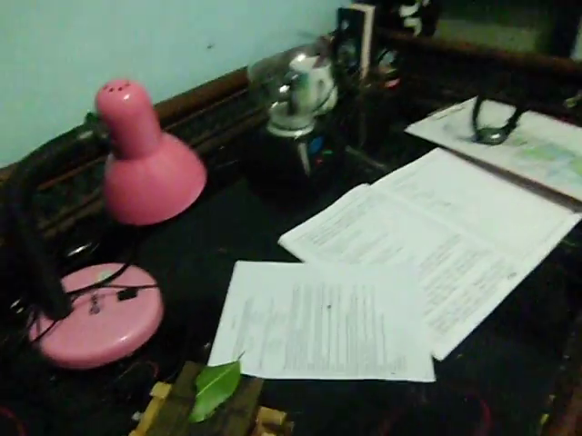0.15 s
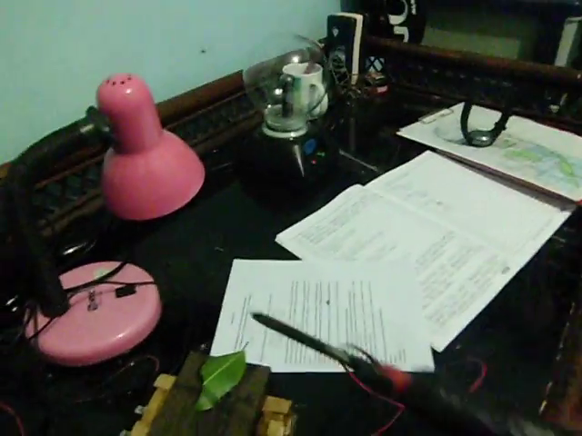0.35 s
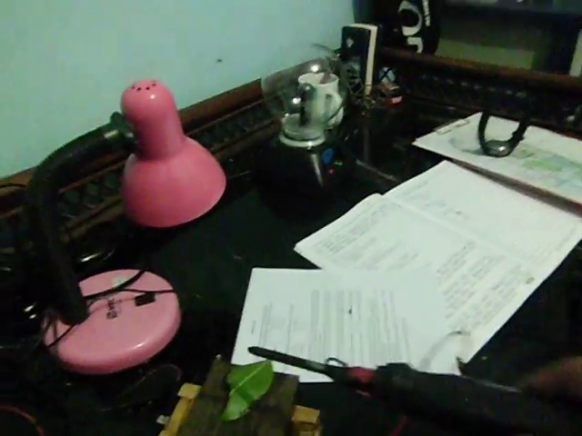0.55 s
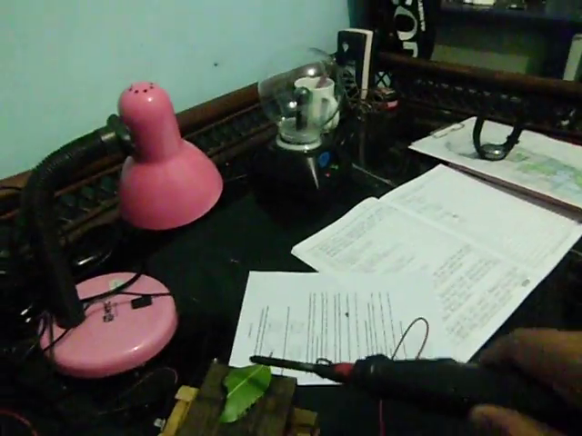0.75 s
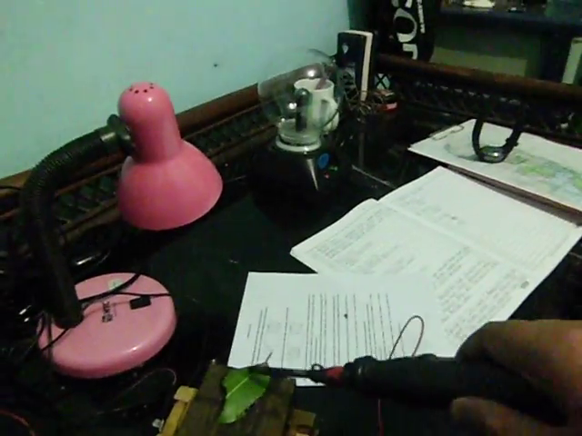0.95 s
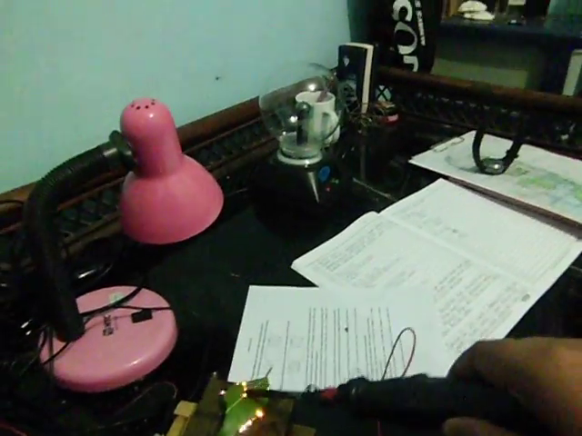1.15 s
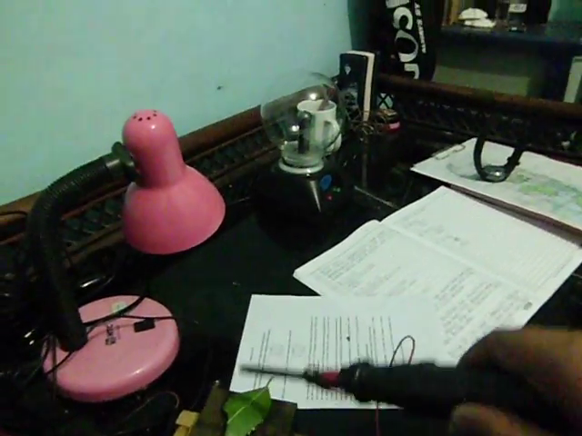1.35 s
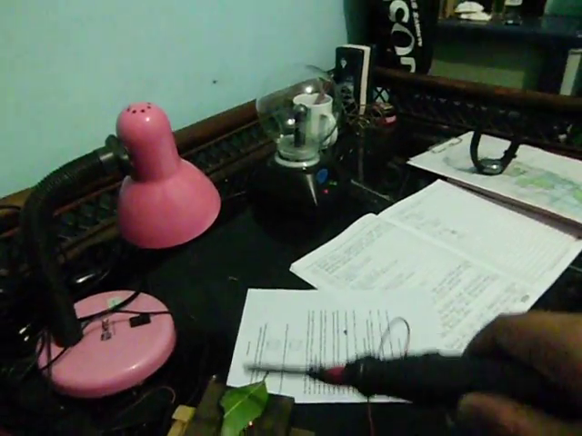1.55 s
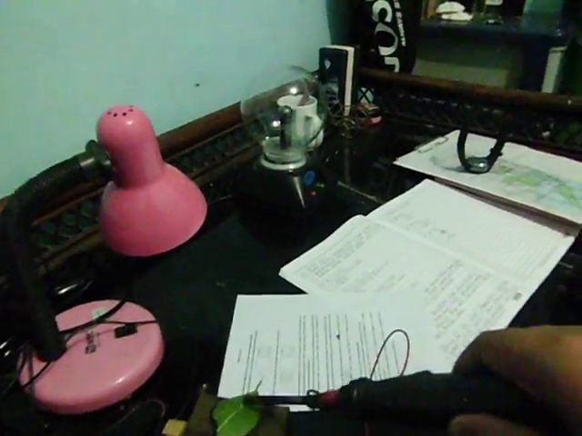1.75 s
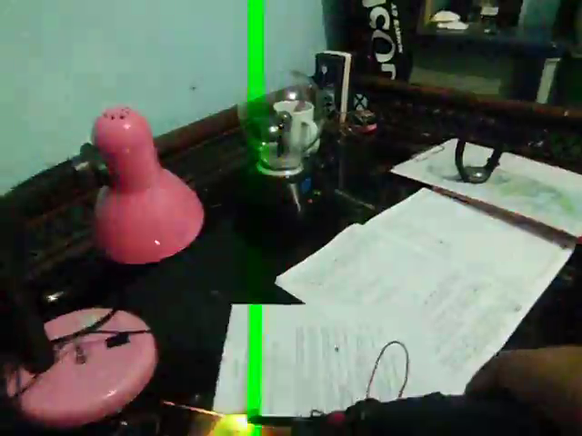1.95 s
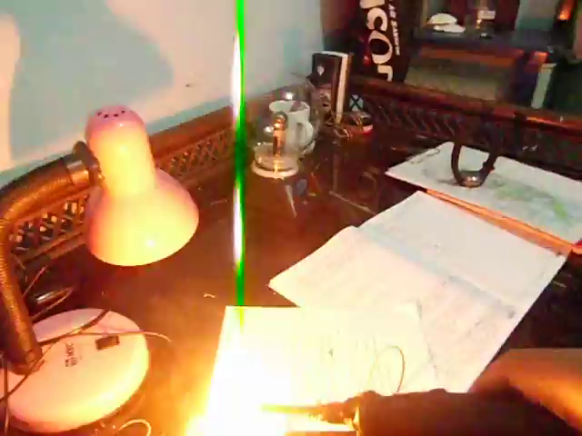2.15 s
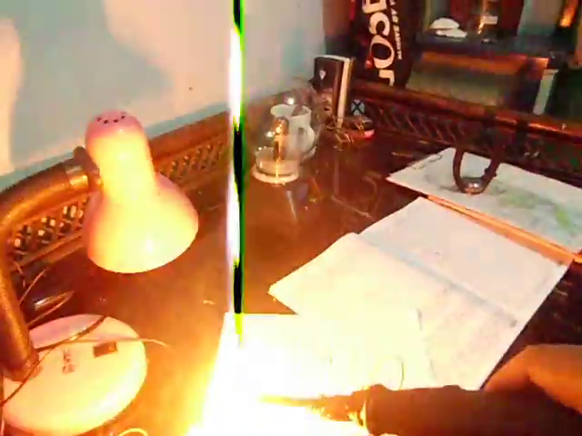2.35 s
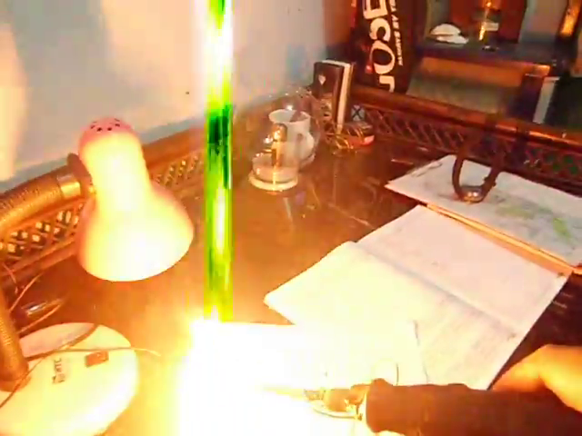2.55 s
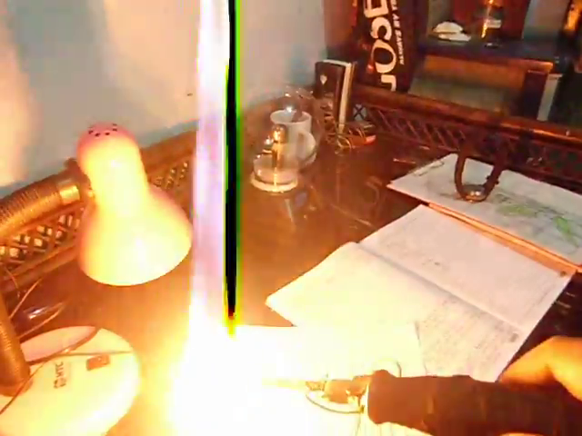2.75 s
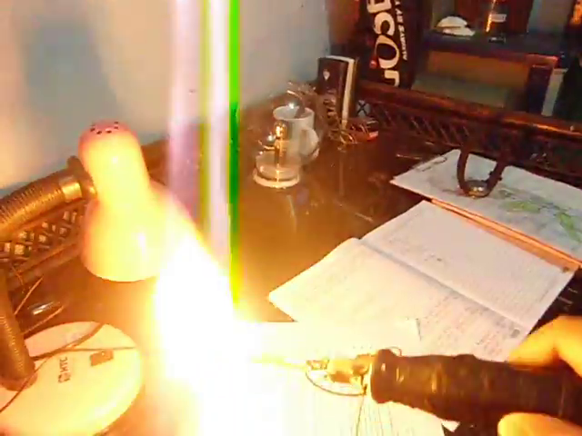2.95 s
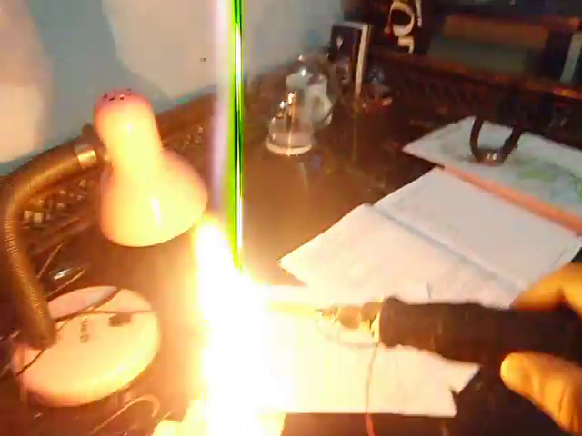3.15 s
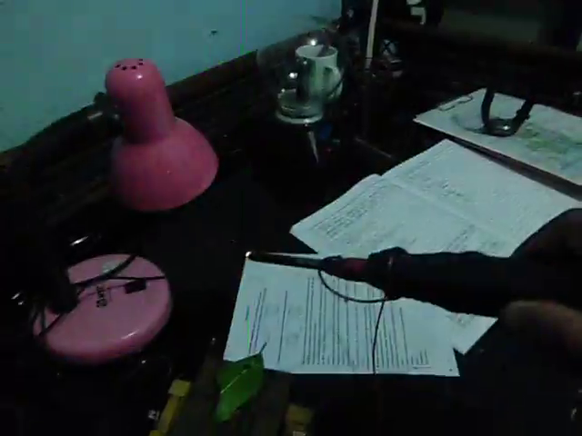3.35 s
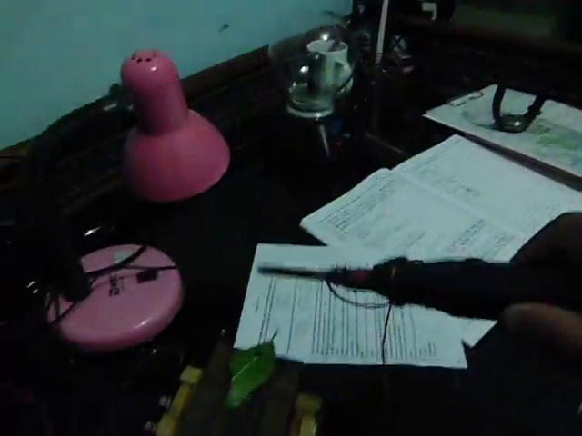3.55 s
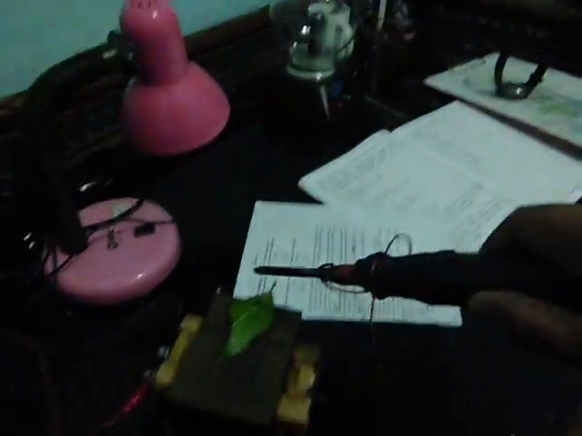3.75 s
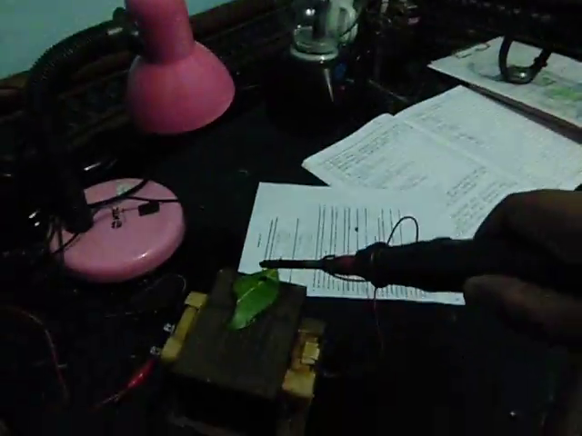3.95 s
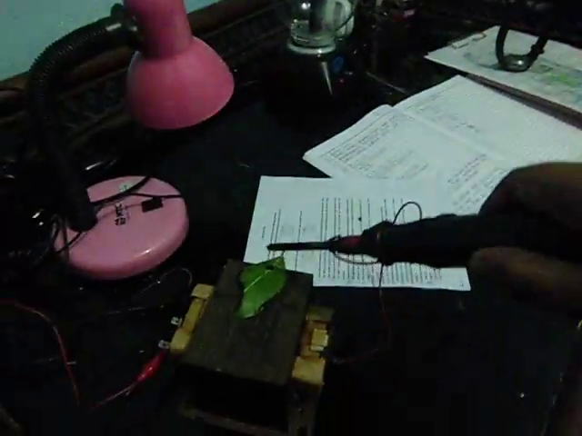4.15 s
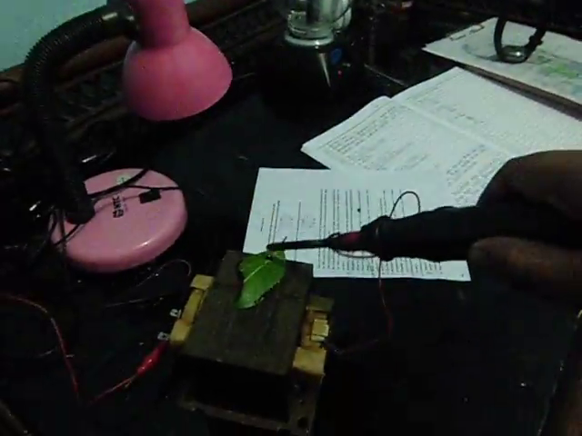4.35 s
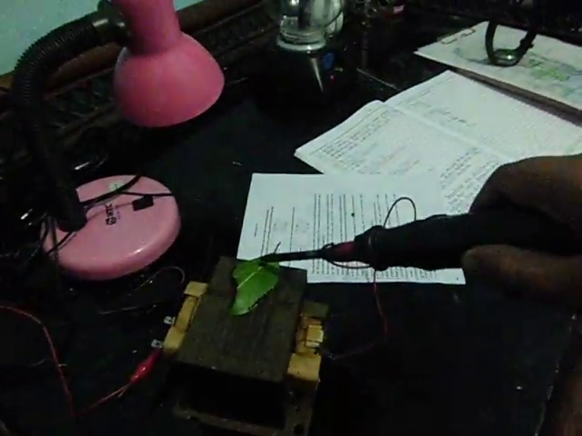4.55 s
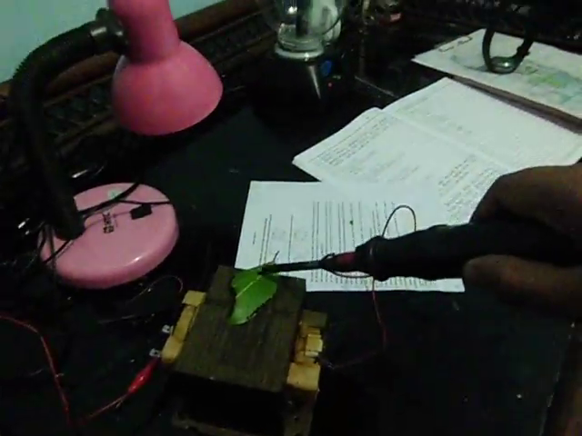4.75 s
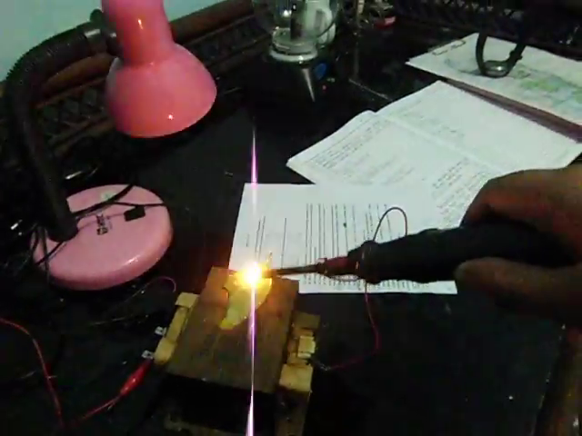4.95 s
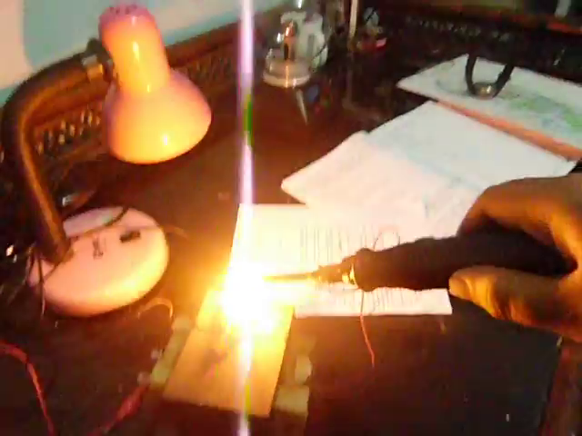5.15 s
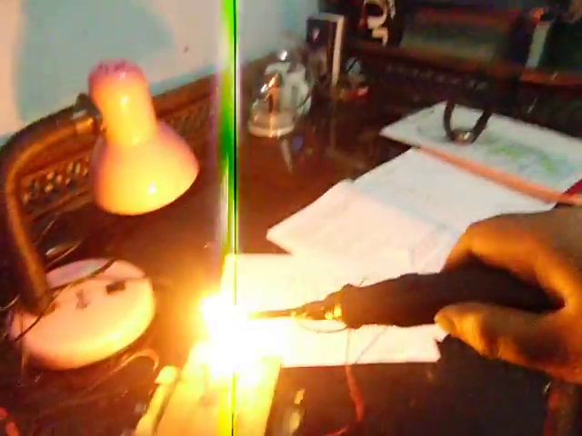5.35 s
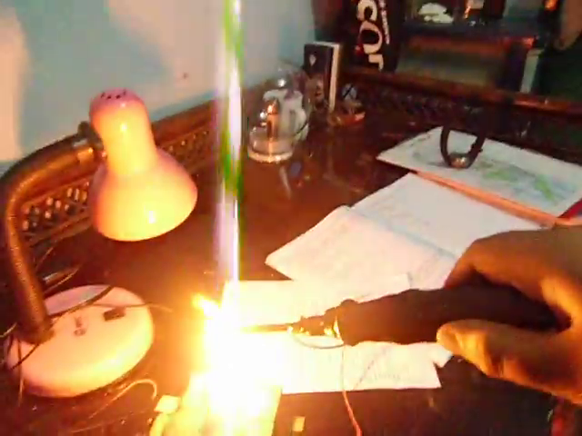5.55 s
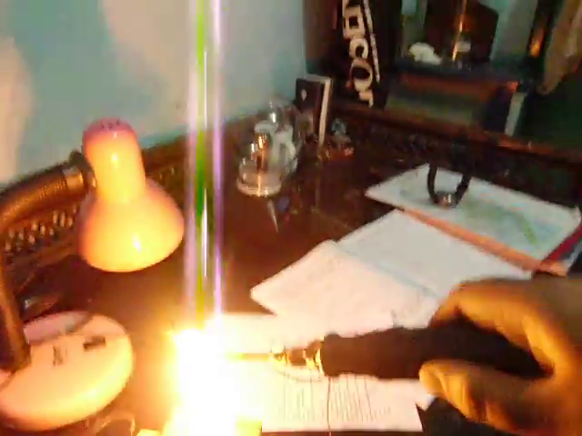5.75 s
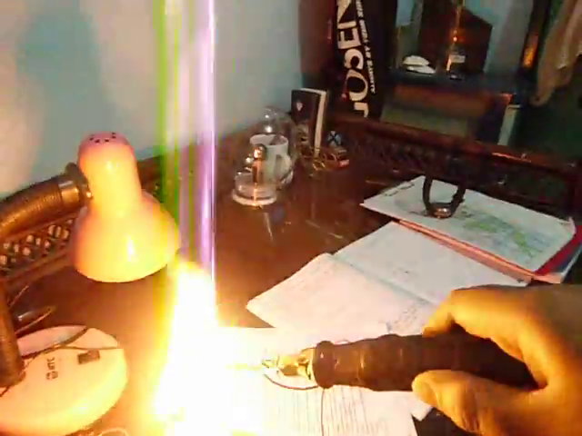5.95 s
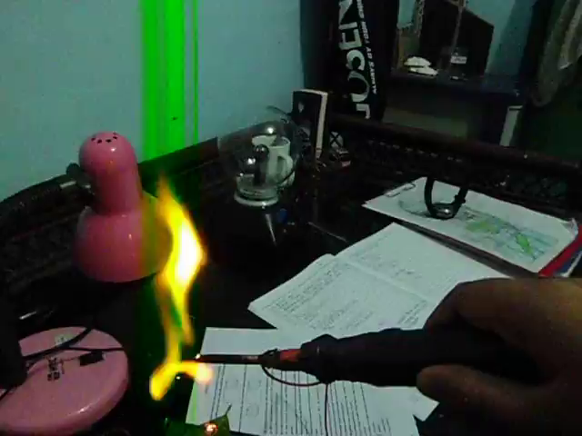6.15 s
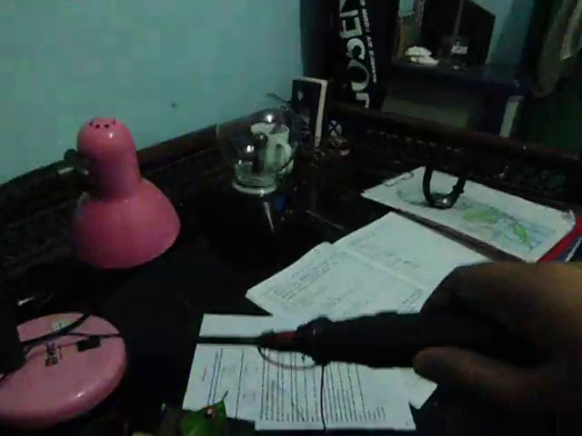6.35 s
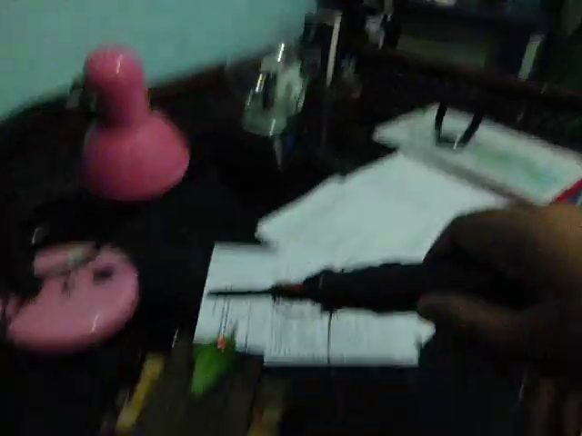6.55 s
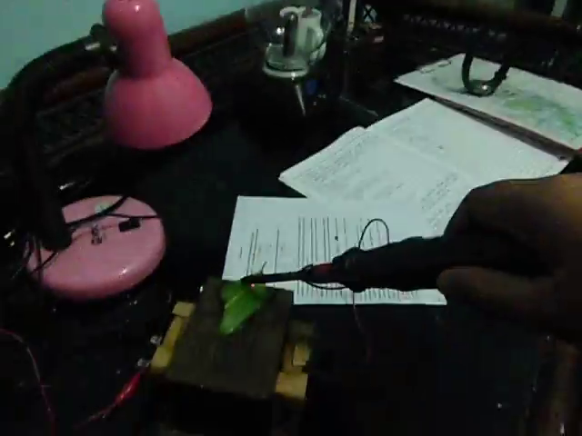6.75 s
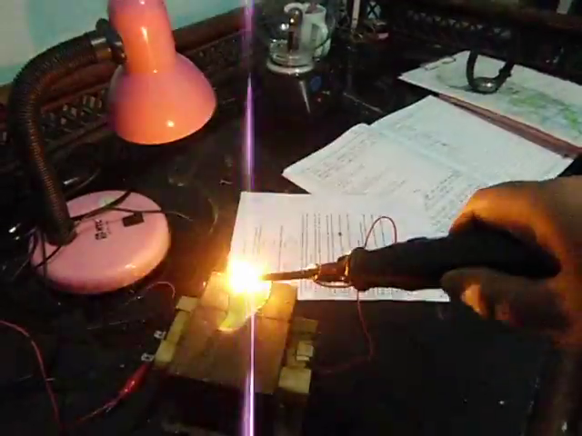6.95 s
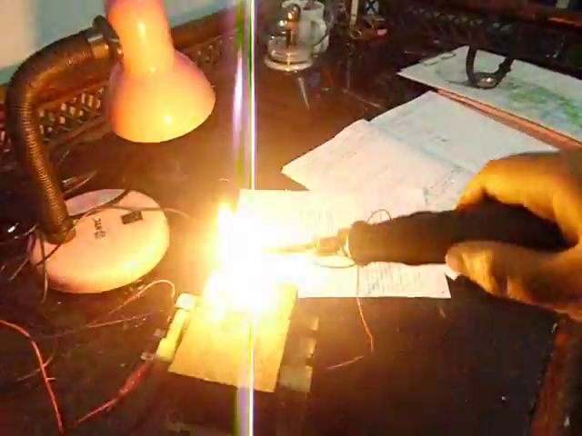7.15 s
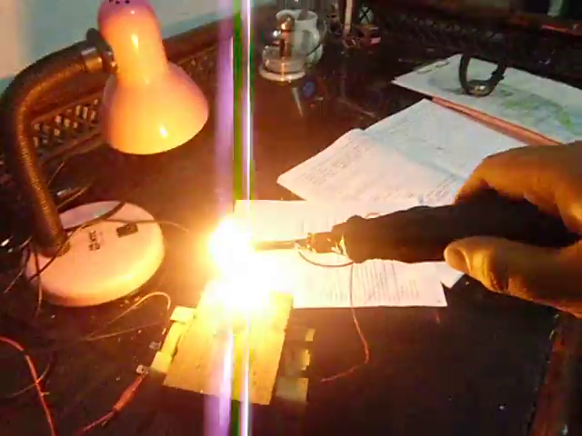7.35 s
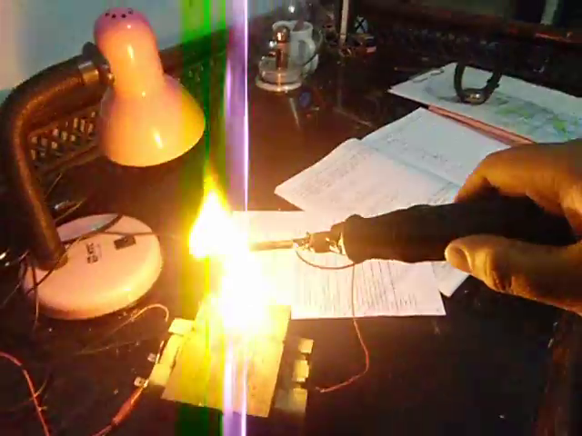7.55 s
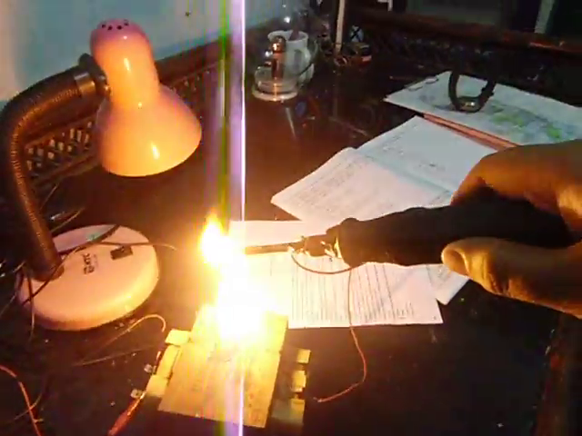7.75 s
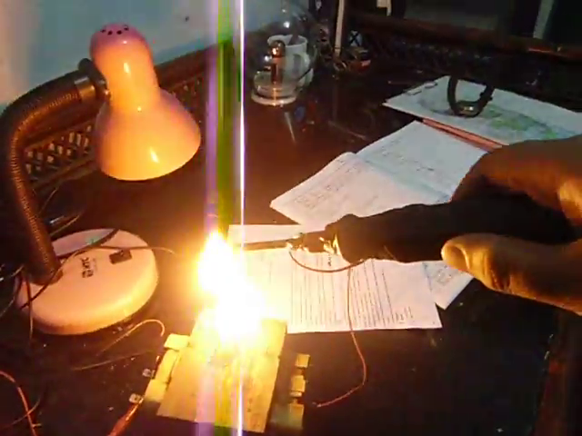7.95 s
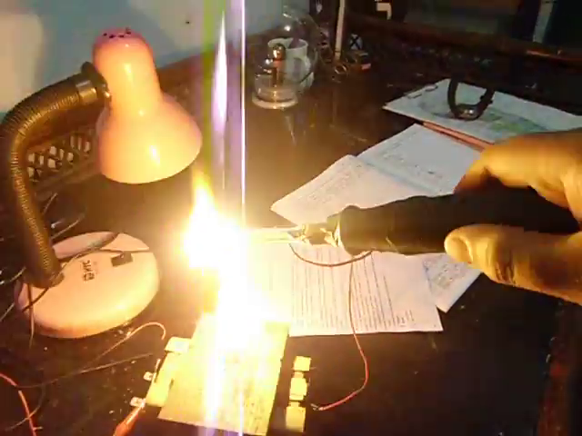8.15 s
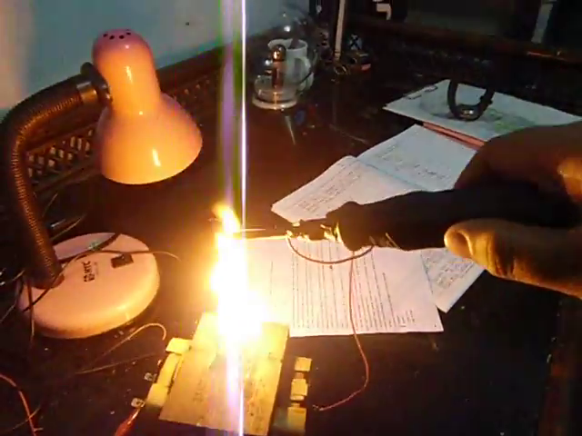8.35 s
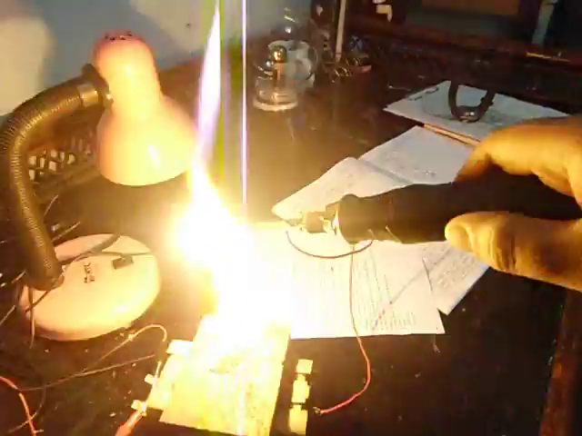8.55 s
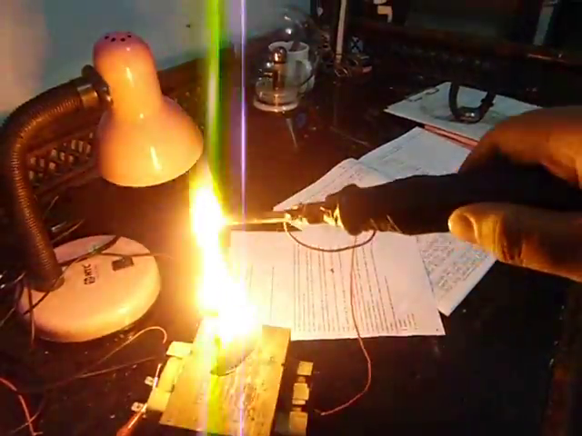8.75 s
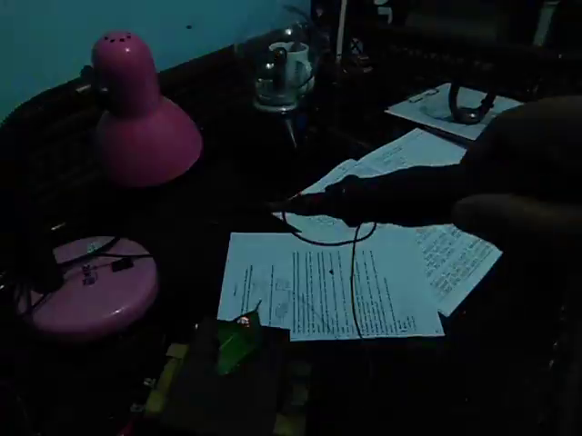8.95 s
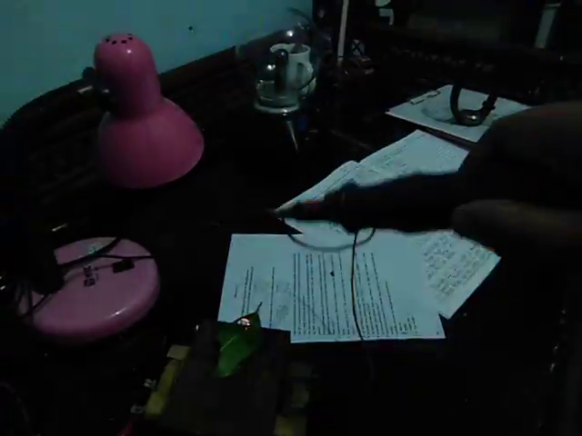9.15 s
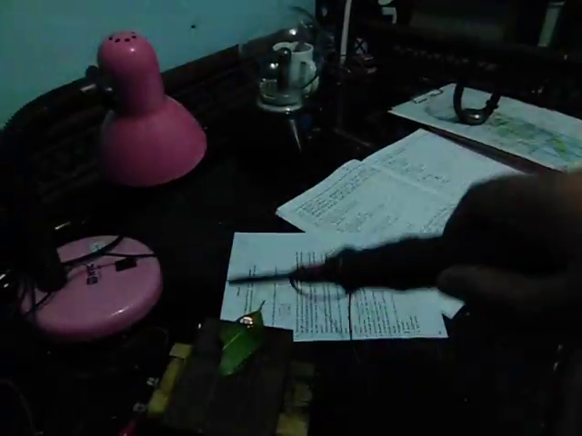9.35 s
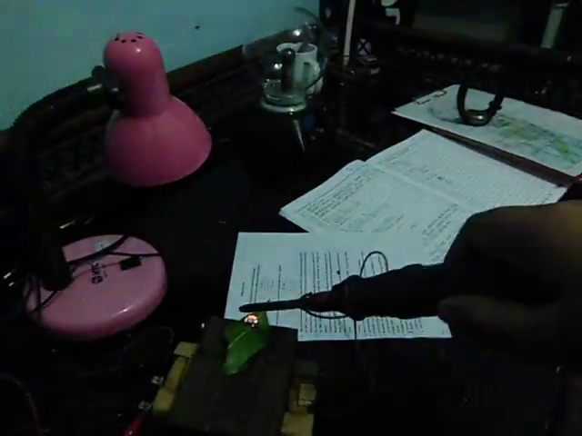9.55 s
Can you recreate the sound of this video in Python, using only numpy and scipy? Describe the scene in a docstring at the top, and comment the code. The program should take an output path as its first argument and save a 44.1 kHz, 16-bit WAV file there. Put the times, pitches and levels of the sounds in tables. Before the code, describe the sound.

Electric arcs spit, buzz and hum at a desk, flames sputtering with sharp cracks, then breaking off into near silence with faint hiss and hum.

```python
"""Electric arcs are drawn from a desk transformer through a wet leaf to a hand-held probe, in a small room.
Four contacts boil the sap in jets and pops. Three grow into flames: hum as the hot channel swells each
half cycle, buzz as it re-strikes at each current zero, growl once it is long, sputter in surges.
Bursting leaf adds cracks, filtered impulses with a noisy shatter. Handling noises are short noise bursts.
Behind lie a faint hum of wavering sines, a soft hiss that swells and fades, and low room noise."""
import sys
import numpy as np
from scipy import signal
from scipy.fft import rfft, irfft
from scipy.io import wavfile
from scipy.ndimage import uniform_filter1d

SR = 44100
rng = np.random.default_rng(int(sys.argv[2]) if len(sys.argv) > 2 else 0)


def dump(signal):
    """Clip the signal to [-1, 1] and save it as 16-bit WAV at the path in sys.argv[1]."""
    limited = np.clip(np.atleast_2d(signal).T, -1, 1)
    pcm = np.round(limited * 32767).astype(np.int16)
    wavfile.write(sys.argv[1], SR, pcm)


N = 427329
TIME = np.arange(N) / SR
HALF_CYCLE_HZ, FIRST_ZERO_CYCLES = 100.148, .2936
# half cycles of the mains; whole numbers are current zeros
CYCLE = HALF_CYCLE_HZ * TIME - FIRST_ZERO_CYCLES + 1


def undb(db):
    """Decibels to gain."""
    return 10 ** (np.asarray(db) / 20)


def unit(x):
    """Scale to an rms of 1."""
    return x / np.sqrt(np.mean(x ** 2))


def walk(rate_hz):
    """Smoothed random steps of spread about 0.8, a new one rate_hz times a second."""
    hold = int(SR / rate_hz)
    steps = np.repeat(rng.standard_normal(N // hold + 1), hold)
    return 0.95 * uniform_filter1d(steps, hold)[:N]


def response(spectrum, size=2048):
    """Minimum-phase impulse response with the given (frequency [Hz], level [dB]) spectrum."""
    hz, db = np.transpose(spectrum)
    freq_hz = np.maximum(np.fft.rfftfreq(size, 1 / SR), 1)
    level_db = np.interp(np.log(freq_hz), np.log(hz), db)
    cepstrum = irfft(np.log(undb(level_db)))
    # folding the cepstrum makes the response causal
    cepstrum[1:size // 2] *= 2
    cepstrum[size // 2 + 1:] = 0
    return irfft(np.exp(rfft(cepstrum)))


def through(x, ring):
    """Convolve a sound with an impulse response."""
    return signal.oaconvolve(x, ring)[:N]


def noise(spectrum):
    """Noise of rms 1 with the given spectrum."""
    return unit(through(rng.standard_normal(N), response(spectrum, size=8192)))


def band(x, hz, width_hz):
    """One resonance, gain 1 at its centre."""
    b, a = signal.iirpeak(hz, hz / width_hz, fs=SR)
    return signal.lfilter(b, a, x)


def pulses(times_s, sizes):
    """Band-limited impulses (windowed sinc) placed between samples."""
    out = np.zeros(N)
    place = np.asarray(times_s)[:, None] * SR
    taps = np.floor(place).astype(int) + np.arange(-7, 9)
    shape = np.sinc(taps - place) * np.sinc((taps - place) / 8)
    np.add.at(out, np.clip(taps, 0, N - 1), shape * np.asarray(sizes)[:, None])
    return out


def bells(rows):
    """Sum of Gaussian bursts from rows (middle [s], level [dB], sigma [ms])."""
    out = np.zeros(N)
    for middle_s, db, sigma_ms in rows:
        sigma_s = sigma_ms / 1000
        first = max(0, int((middle_s - 4 * sigma_s) * SR))
        near = slice(first, int((middle_s + 4 * sigma_s) * SR))
        out[near] += undb(db) * np.exp(-((TIME[near] - middle_s) / sigma_s) ** 2 / 2)
    return out


def between(start_s, end_s, fade_s=0.0083):
    """Gate open from start to end, with linear fades."""
    return np.clip(np.minimum(TIME - start_s, end_s - TIME) / fade_s + .5, 0, 1)


def cycle_scatter(spread_db):
    """A new random gain for every half cycle."""
    gains = undb(spread_db * rng.standard_normal(int(CYCLE[-1]) + 1))
    return gains[CYCLE.astype(int)]


# flames: (lights [s], breaks [s], final hum before surges [dB], growth exponent [-], growl sets in [s],
#          growl [dB], first buzz [dB], buzz fade [dB/s], sizzle [dB])
FLAMES = [(1.967, 3.183, -33, 0.7, 2.41, -54.5, -45.5, 17, -47),
          (4.976, 6.078, -37, 0.66, 5.28, -55.5, -58, 5.5, -50.5),
          (6.75, 8.791, -36.5, .62, 7.05, -52.5, -58.5, 6, -53.5)]
# flame balloons and sputters on fresh leaf: (middle [s], swell [dB], relative sputter [dB])
FLAME_SURGES = [(2.472, 4, -42), (2.61, 4, -58), (2.735, 5.5, -69), (2.902, 3.5, -49), (3.01, 1.5, -52),
                (3.165, 3, -47), (5.614, 7.5, -44.5), (5.743, 5.5, -38.5), (5.901, 7.5, -43),
                (6.033, 7, -41), (7.22, 7, -45), (7.345, 7.5, -47), (7.47, 5.5, -41.5), (7.946, 4.5, -40),
                (8.198, 3, -38), (8.47, 1.5, -42.5), (8.63, 2, -47), (8.766, 5, -41)]
# probe on wet leaf, sap boiling: (start [s], end [s], first jet [dB], last jet [dB], hum [dB],
#                                  frying [dB], frying decay [s])
LEAF_BOILS = [(1.091, 1.211, -26, -22, -46, -43, .02), (1.8, 1.887, -28, -17.5, -48, -32, 0.2),
              (4.892, 4.939, -47.5, -42, -60, -48, 0.115), (6.732, 6.756, -23.5, -17.5, -48, -60, 0.15)]


def arc_gains(surge_sigma_s=0.021, growl_rise_s=0.089, burn_db=-15, stretch_s=0.028,
              surge_to_growl=0.46, surge_to_sizzle=0.94, stretch_growl_db=8, stretch_buzz_db=-13):
    """Gains of hum, growl, buzz, sizzle: a drawn-out flame hums more, starts to growl and buzzes less."""
    swell_db = sum(db * np.exp(-((TIME - s) / surge_sigma_s) ** 2 / 2) for s, db, _ in FLAME_SURGES)
    hum, growl, buzz, sizzling = np.zeros((4, N))
    for (lights_s, breaks_s, hum_db, growth, growls_s,
         growl_db, buzz_db, fade_db_per_s, sizzle_db) in FLAMES:
        lit = between(lights_s, breaks_s)
        age_s = np.clip(TIME - lights_s, 0, breaks_s - lights_s)
        size = undb(hum_db) * (age_s / (breaks_s - lights_s)) ** growth
        long_flame = (1 + np.tanh((TIME - growls_s) / growl_rise_s)) / 2
        # near the break the stretched flame growls more, buzzes and sizzles less
        stretch = np.exp(-np.abs(breaks_s - TIME) / stretch_s)
        hum += lit * size * undb(swell_db)
        growl_level_db = growl_db + surge_to_growl * swell_db + stretch_growl_db * stretch
        growl += lit * long_flame * undb(growl_level_db)
        buzz += lit * undb(buzz_db - fade_db_per_s * age_s + stretch_buzz_db * stretch)
        # the hiss of burning grows with the flame
        burning = np.hypot(undb(sizzle_db), undb(burn_db) * size)
        sizzling += lit * burning * undb(surge_to_sizzle * swell_db + stretch_buzz_db * stretch)
    # current through the wet leaf hums too; the leaf fries on as it dries
    for start_s, end_s, _, _, hum_db, frying_db, dry_s in LEAF_BOILS:
        hum += undb(hum_db) * between(start_s, end_s)
        frying = undb(frying_db) * (TIME > start_s) * np.exp(-np.abs(TIME - end_s) / dry_s)
        sizzling = np.hypot(sizzling, frying)
    return hum, growl, buzz, sizzling


def flame(hum, growl, octave_db=-21, twelfth_db=-1.5, double_octave_db=-11,
          churn_db=-13, roar_db=-17, restless_db=-33):
    """The channel swells with each half cycle's power; a long, restless one adds overtones and roar."""
    turn = 2 * np.pi * (HALF_CYCLE_HZ * TIME - FIRST_ZERO_CYCLES)
    overtones = [(2, hum * undb(octave_db)),
                 (3, growl * undb(twelfth_db)),
                 (4, growl * undb(double_octave_db))]
    tone = hum * np.cos(turn)
    for harmonic, gain in overtones:
        tone += gain * undb(2.5 * walk(20)) * np.cos(harmonic * turn)
    flutter = unit(band(band(rng.standard_normal(N), 310, 300), 310, 300))
    restless = hum ** 4 / (hum ** 4 + undb(restless_db) ** 4)
    flutter_gain = undb(churn_db) * growl + undb(roar_db) * restless * hum
    return -np.sqrt(2) * tone + flutter_gain * flutter


# snap spectrum: (frequency [Hz], level [dB])
SNAP_SPECTRUM = [(160, -19), (360, -4), (530, 10.5), (780, -12), (900, -3.5), (1040, -14.5), (1310, 4),
                 (1600, -6), (1900, 0), (2900, -0.5), (4200, -3), (5000, -10.5), (5900, 0), (8300, -19),
                 (16000, -27)]
# blunt rasp spectrum: (frequency [Hz], level [dB])
RASP_SPECTRUM = [(250, -24), (500, 11.5), (750, -25.5), (900, -2), (1050, -18.5), (1300, 7.5), (1500, -6.5),
                 (1750, 0), (2400, -13.5), (8000, -45.5)]
# spark spray and frying leaf spectrum, also for sizzle(): (frequency [Hz], level [dB])
FRYING_SPECTRUM = [(250, -8.5), (850, -11), (1400, -5.5), (2200, -5.5), (3100, -7.5), (4100, -2),
                   (4900, -4), (5800, -2.5), (7000, -9.5), (8600, -12), (10500, -16), (16000, -28)]


def restrikes(buzz, growl, strike_db=2.5, spray_db=-8.0, rasp_db=-7, fierce_db=-45,
              scatter_db=1.4, jitter_s=.000018):
    """The arc dies at each current zero and snaps alight, spraying sparks; a long flame rasps."""
    times_s = (np.arange(int(N / SR * HALF_CYCLE_HZ)) + FIRST_ZERO_CYCLES) / HALF_CYCLE_HZ
    late, size = rng.standard_normal((len(times_s), 2)).T
    kicks = pulses(times_s + jitter_s * late, -undb(scatter_db * size))
    # harder snaps spray more
    spray_rows = [(s + .0005, 2 * z, .5) for s, z in zip(times_s, size)]
    spray = unit(bells(spray_rows) * noise(FRYING_SPECTRUM))
    # a strong buzz has less snap and more spray
    fierce = np.sqrt(1 + (buzz / undb(fierce_db)) ** 2)
    snaps = unit(through(kicks, response(SNAP_SPECTRUM))) / fierce
    strikes = snaps + undb(spray_db) * fierce * spray
    rasp = unit(through(kicks, response(RASP_SPECTRUM)))
    return buzz * undb(strike_db) * strikes + growl * undb(rasp_db) * rasp


# sputter spectrum: (frequency [Hz], level [dB])
SPUTTER_SPECTRUM = [(25, -5), (100, 15.5), (300, 9), (700, -6.5), (1300, 3.5), (2600, -10), (5000, -11.5),
                    (8000, -15), (16000, -29)]


def flares(scatter_db=3, sputter_db=2, sigma_s=.014, lead_s=0.0068):
    """With each surge the flame sputters for a few uneven half cycles."""
    rows = [(s - lead_s, db + sputter_db, 1000 * sigma_s) for s, _, db in FLAME_SURGES]
    pulsing = np.sin(np.pi * CYCLE) ** 2 * cycle_scatter(scatter_db)
    return bells(rows) * pulsing * noise(SPUTTER_SPECTRUM)


def sizzle(gain, frying_db=-6, ticking_db=-12, uneven_db=7.5, ticks_per_s=70):
    """The burning leaf hisses unevenly around each current peak and ticks at random."""
    pulsing = .15 + cycle_scatter(uneven_db) * np.sin(np.pi * CYCLE) ** 4
    hiss = unit(noise(FRYING_SPECTRUM) * pulsing)
    chance = rng.random(N)
    size = np.minimum(rng.exponential(size=N), 3.5)
    clicks = (chance < ticks_per_s / SR) * undb(4 * size)
    ticks = unit(through(clicks, response(FRYING_SPECTRUM)))
    return gain * (undb(frying_db) * hiss + undb(ticking_db) * ticks)


# bursting sap pockets: (middle [s], level [dB], sigma [ms])
SAP_BURSTS = [(1.093, -29.5, 0.63), (1.1243, -18.5, 2), (1.1648, -18, 1.75), (1.1842, -16, 1.1),
              (1.8039, -13, 0.18), (1.8545, -14.5, 1.1), (1.8625, -10, 1.7), (1.8742, -9.5, 0.74),
              (1.905, -22.5, 2.8), (1.9712, -23.5, 0.69), (2.0009, -18.5, 0.22), (2.0244, -20, 0.26),
              (2.0513, -20.5, 1.04), (2.1236, -25, 0.34), (2.173, -36.5, 0.8), (2.5358, -24, .6),
              (4.8972, -34, 1.1)]
# steam and sap spectrum: (frequency [Hz], level [dB])
SAP_SPECTRUM = [(200, -8), (750, -14), (1400, -12.5), (2700, -5), (4100, 0), (4750, -3.5), (5450, 5),
                (7500, -0.5), (10500, -3.5), (16000, -14)]


def spits(jet_phase_cycles=.35, jet_sigma_cycles=0.19, jet_scatter_db=2):
    """Boiling sap leaves the leaf as one steam jet per half cycle; pockets of sap pop."""
    boiling = np.zeros(N)
    for start_s, end_s, first_db, last_db, *_ in LEAF_BOILS:
        jet_db = np.interp(TIME, [start_s, end_s], [first_db, last_db])
        boiling += between(start_s, end_s, .002) * undb(jet_db)
    jets = np.exp(-((CYCLE % 1 - jet_phase_cycles) / jet_sigma_cycles) ** 2 / 2)
    jets *= cycle_scatter(jet_scatter_db)
    return np.hypot(boiling * jets, bells(SAP_BURSTS)) * noise(SAP_SPECTRUM)


# leaf bursts: (time [s], level [dB], sharpness: share of shock front against round puff [0-1])
LEAF_CRACKS = [(1.874, -2, 0.089), (2.7438, -1.5, 0.21), (2.81, -14, 0.057), (2.9207, -2.5, 0.13),
               (3.011, -2.5, 0.39), (5.5785, -18.5, 0.57), (5.6874, -17, 0.23), (5.7675, 9, 0.64),
               (5.925, 2.5, 0.47), (6.7456, -10, 0.21), (7.2362, -11, 0.12), (7.2454, -16.5, 0.33),
               (7.2662, -13.5, 0.75), (7.3676, -6.5, 0.27), (7.442, -17.5, 0.87), (7.483, -13, 0.26),
               (8.2234, 8, .65), (8.323, -18.5, 0.37), (8.4861, -9, 0.26), (8.6536, -2, 0.35)]
# puff spectrum: (frequency [Hz], level [dB])
PUFF_SPECTRUM = [(25, -8.5), (100, 9.5), (400, -2), (1100, 4), (2400, 2.5), (4000, 0.5), (6000, -1.5),
                 (9000, -20.5), (16000, -22)]
# shock spectrum: (frequency [Hz], level [dB])
SHOCK_SPECTRUM = [(100, -38), (600, -15), (1500, 6.5), (3000, 4.5), (4200, 9), (5500, 8.5), (8000, 5),
                  (11000, -0.5), (14000, -3), (16000, -8)]


def cracks(front_db=-4, shatter_db=-12.5, all_round_db=3):
    """Pressure spikes, round puffs to shocks with a brief crackle; returns (direct, spread into room)."""
    times_s, db, sharp = np.transpose(LEAF_CRACKS)
    sharp = np.clip(sharp, .01, 1)
    puff, shock = response(PUFF_SPECTRUM), response(SHOCK_SPECTRUM)
    puffs = through(pulses(times_s, undb(db) * (1 - sharp)), puff / puff.max())
    fronts = through(pulses(times_s, undb(db + front_db) * sharp), shock / shock.max())
    crackle_db = db + 20 * np.log10(sharp)
    crackle = bells([(s + .0005, level_db, .3) for s, level_db in zip(times_s, crackle_db)])
    direct = puffs + fronts + undb(shatter_db) * crackle * noise(SHOCK_SPECTRUM)
    return direct, puffs + undb(all_round_db) * fronts


# direct path, then desk and nearby things: (delay [ms], gain [-])
DESK_PATHS = [(0, 0.73), (.87, 0.15), (1.2, -.22), (2.32, 0.23)]


def desk(x):
    """The direct sound and its first reflections."""
    out = np.zeros(N)
    for delay_ms, gain in DESK_PATHS:
        lag = int(abs(delay_ms) * SR / 1000)
        out[lag:] += gain * x[:N - lag]
    return out


# probe handling noises: (middle [s], level [dB], centre [Hz], sigma [ms])
PROBE_SCUFFS = [(.5671, -62, 2740, 5.4), (.675, -72, 5440, 39), (1.5272, -61.5, 3000, 3),
                (6.352, -68, 4220, 19.5), (6.397, -64.5, 4360, 6.7), (6.55, -68.5, 2800, 5.4)]


def handling(width_hz=1700):
    """Faint taps and scuffs, bursts of band noise, as the probe and its lead are moved."""
    scuff = rng.standard_normal(N)
    out = np.zeros(N)
    for middle_s, db, hz, sigma_ms in PROBE_SCUFFS:
        rub = unit(band(band(scuff, hz, width_hz), hz, width_hz))
        out += bells([(middle_s, db, sigma_ms)]) * rub
    return out


# steady hum and a faint high whine: (frequency [Hz], level [dB], waver [dB])
IDLE_HUM = [(157, -71, 3), (300.45, -70.5, 1.5), (15622, -95, 1)]
# runs of evenly spaced hiss swells: (first swell [s], last swell [s], level [dB])
HISS_SWELLS = [(.03, 1.48, -66.5), (3.382, 5.68, -66), (6.12, 6.57, -65), (9.24, 9.24, -70)]
# hiss spectrum: (frequency [Hz], level [dB])
HISS_SPECTRUM = [(500, -15.5), (2000, -10.5), (3600, -3), (5500, -1), (8000, -4.5), (11000, -8),
                 (16000, -16)]
# room noise spectrum: (frequency [Hz], level [dB])
ROOM_SPECTRUM = [(22, -6), (58, 1.5), (105, -3.5), (155, 2.5), (190, -10), (270, -12.5), (400, -22.5),
                 (700, -29), (1500, -33), (6000, -34.5), (9500, -41), (16000, -79)]


def background(swell_sigma_ms=82, swell_every_s=.48, room_tone_db=-58):
    """Low room noise, an idle hum of wavering sines and hiss under bell-shaped swells."""
    hum = np.zeros(N)
    for hz, db, waver_db in IDLE_HUM:
        level = np.sqrt(2) * undb(db + waver_db * walk(8))
        # the phase wanders too
        hum += level * np.sin(2 * np.pi * hz * TIME + waver_db * walk(8) / 4)
    swells = []
    for first_s, last_s, db in HISS_SWELLS:
        count = round((last_s - first_s) / swell_every_s) + 1
        swells += [(s, db, swell_sigma_ms) for s in np.linspace(first_s, last_s, count)]
    room_tone = noise(ROOM_SPECTRUM) * undb(room_tone_db)
    return room_tone + hum + bells(swells) * noise(HISS_SPECTRUM)


def room(x, reverb_db=-13, low_t60_s=.38, high_t60_s=0.3):
    """Short diffuse tail of a small furnished room: decaying noise whose treble dies first."""
    t = TIME[:SR // 2]
    highpass = signal.butter(2, 280, "high", fs=SR, output="sos")
    scatter = signal.sosfilt(highpass, rng.standard_normal(len(t)))
    low = signal.sosfilt(signal.butter(1, 2500, fs=SR, output="sos"), scatter)
    tail = low * 1000 ** (-t / low_t60_s) + (scatter - low) * 1000 ** (-t / high_t60_s)
    tail *= t > .003
    return undb(reverb_db) * through(x, tail / np.sqrt(np.sum(tail ** 2)))


def scene(room_mode_db=-10.5, spread_db=0.5):
    """All sources at the desk; a low room mode lets the hum linger after each arc breaks."""
    hum, growl, buzz, sizzling = arc_gains()
    body = flame(hum, growl)
    room_mode = band(body, 108, 5)
    near = body + restrikes(buzz, growl) + sizzle(sizzling) + spits() + flares() + handling()
    bangs, spread = cracks()
    # cracks burst high in the flame: the desk doubles them and they fill the room more
    echo = room(near + undb(spread_db) * spread)
    return (near + undb(room_mode_db) * room_mode + desk(bangs) + echo + background())[None]


def record(dry, offset=.007, top_hz=16100):
    """The microphone rounds high peaks and adds a small steady offset; the top is cut."""
    lowpass = signal.ellip(10, .2, 80, top_hz, fs=SR, output="sos")
    return signal.sosfilt(lowpass, np.tanh(dry)) + offset


dry = scene()
out = record(dry)
dump(out)
```